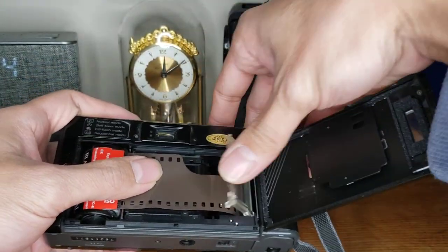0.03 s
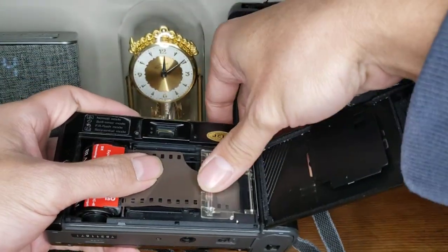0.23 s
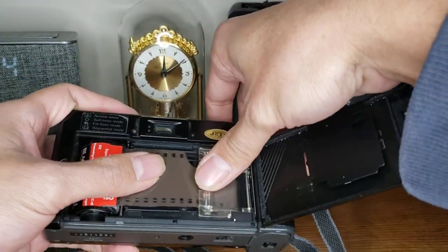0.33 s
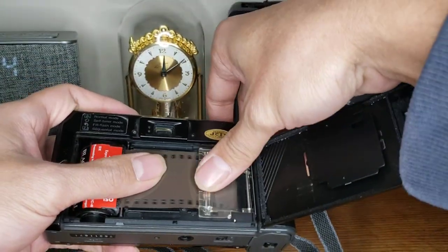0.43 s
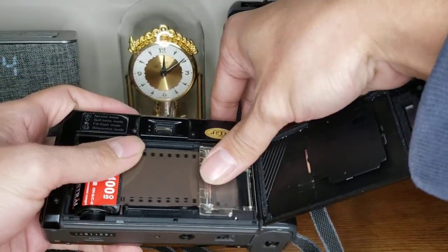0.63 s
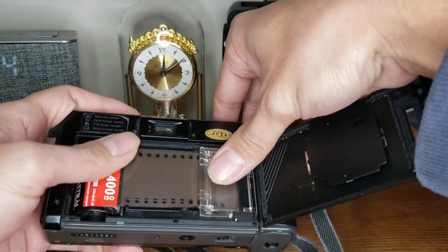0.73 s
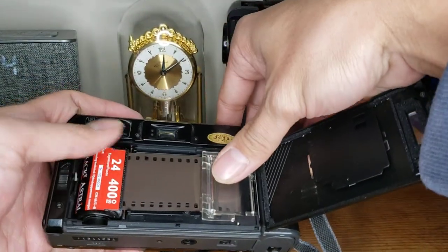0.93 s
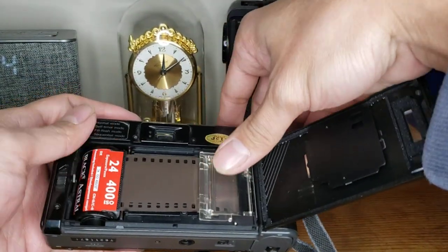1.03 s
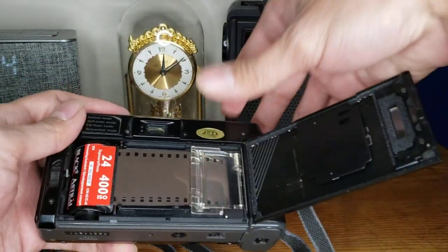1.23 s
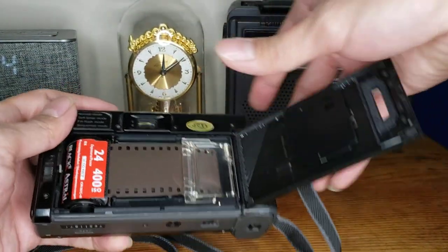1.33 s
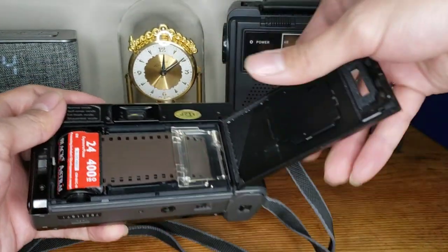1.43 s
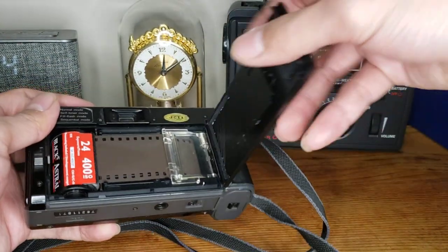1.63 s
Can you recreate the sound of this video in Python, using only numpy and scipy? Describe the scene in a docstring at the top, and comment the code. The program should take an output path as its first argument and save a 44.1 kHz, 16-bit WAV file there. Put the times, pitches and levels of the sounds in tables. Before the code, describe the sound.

A small camera motor whirs briefly, close and slightly left in a quiet room. Plastic clicks sharply around 0.2 seconds as film is pressed in. The motor spins up at 0.3 seconds with buzzing gears, stops with a clatter near 0.8 and twitches once. Faint taps and a soft bump follow, then fingers brush the open back around 1.6 seconds. A faint electrical hum lies underneath.

```python
"""An open compact camera close to a stereo microphone, slightly left, in a small quiet room.
A thumb presses the film in and plastic parts click. At 0.3 s the transport motor spins up and whirs,
its gear teeth ringing the body; near 0.8 s it stops with a clatter and twitches once more.
A few faint taps follow, a hand bumps the body, and from 1.5 s fingers brush the open back.
Mains hum, a thin whine and faint room noise lie underneath."""
import sys
import numpy as np
from scipy import signal
from scipy.fft import rfft, irfft
from scipy.io import wavfile
from scipy.ndimage import uniform_filter1d

SR = 44100
rng = np.random.default_rng(int(sys.argv[2]) if len(sys.argv) > 2 else 0)


def master_out(mix):
    """Clip the mix to full scale and print it as 16-bit PCM to the path in sys.argv[1]."""
    frames = np.transpose(np.atleast_2d(mix))
    ceiling = np.clip(frames, -1, 1)
    pcm = np.round(ceiling * 32767).astype(np.int16)
    wavfile.write(sys.argv[1], SR, pcm)


N = 74970

# motor shaft: t/s, speed/(turns per s)
SHAFT_SPEED = [(0.3, 175), (0.322, 203.5), (0.35, 217), (0.376, 231), (0.402, 238.2), (0.49, 239.1),
               (0.55, 241), (0.66, 241.3), (0.735, 238), (0.76, 234), (0.8, 200), (0.82, 140), (0.845, 190),
               (0.88, 110)]
# gear train: t/s, rattle level/dB, treble rasp level/dB
GEAR_LEVELS = [(0.295,-61,-63), (0.321,-47.5,-41), (0.343,-37,-39.5), (0.375,-42.5,-37.5), (0.42,-39.5,-35),
               (0.52,-39,-33), (0.645,-39.5,-35), (0.69,-37.5,-33.5), (0.729,-40.5,-37), (0.758,-35.5,-31),
               (0.776,-28,-28), (0.795,-51,-59), (0.821,-66.5,-57.5), (0.829,-48,-73), (0.845,-46,-42.5),
               (0.885,-63.5,-76)]
# resonances of the camera body under the gears: f/Hz, gain/dB
GEAR_BODY = [(150, -35), (350, -22), (600, -15.5), (1100, -9), (1400, 1), (1900, -1), (2200, -1),
             (2400, -0.5), (2900, -6.5), (3500, -2.5), (4050, -10), (4750, -6.5), (5500, -5), (6500, -11),
             (7300, -3.5), (8200, -16), (9100, -11), (9600, -6), (10600, -4.5), (11400, -3.5),
             (12500, -3.5), (13200, -11), (14000, -8.5), (15700, -19.5)]
# clean lines of the motor: multiple of shaft speed, level/dB at full speed and load
WHINE_LINES = {1: -70, 4: -57, 5: -56, 6: -53, 7: -59, 8: -57, 9: -53, 10: -43, 20: -44, 30: -50}
# hum of the three rotor poles: t/s, level/dB
POLE_HUM = [(0.35, -72), (0.39, -58.5), (0.47, -66), (0.52, -53), (0.63, -46), (0.69, -56), (0.74, -54),
            (0.8, -86.5)]
# thin ring of the pinion running light: t/s, level/dB
PINION_RING = [(0.32, -79), (0.41, -38.5), (0.56, -45), (0.68, -48), (0.76, -51)]
# groans of the drive: middle t/s, half length/s, f/Hz, width/Hz, level/dB
GROANS = [(0.324, 0.012, 1425, 205, -43.5), (0.674, 0.022, 2050, 830, -40),
          (0.847, 0.011, 1600, 700, -47.5)]
# sharp clicks of latch and gears: t/s, level/dB, tilt/(dB per octave), t60/s
LATCH_CLICKS = [(0.2453, -18.5, 2, .009), (0.3505, -29.5, -1, .012), (0.5035, -28, -1.5, .009),
                (0.7638, -26.5, -.5, .012), (0.773, -24, -.5, .012), (0.8435, -42, -2, .012)]
# ring of the clicking parts: f/Hz, gain/dB
LATCH_BODY = [(150, -22), (600, -19), (1200, -6), (1750, -1.5), (2300, 3.5), (3000, -7.5), (3500, -3.5),
              (4300, 1), (4750, -2), (5300, 9.5), (6300, -13.5), (7300, -3), (8400, -15), (9700, 6),
              (12000, -4), (13200, -6.5), (14000, -6), (15300, -6.5)]
# softer taps of the thumb on the film and its clear cover: t/s, level/dB, tilt/(dB per octave), t60/s
THUMB_TAPS = [(0.184, -61, -1, 0.02), (0.1872, -36, 4.5, 0.013), (0.1903, -42.5, 4, 0.038),
              (0.2, -55, 5, .12), (0.2275, -42.5, 0.5, 0.046), (0.2352, -47, -2, .012),
              (0.2572, -43, -4, 0.036), (0.9502, -60.5, -1, 0.016), (1.1977, -66.5, 0.5, 0.03),
              (1.2406, -71, 6, 0.029)]
# ring of the cover: f/Hz, gain/dB
COVER_BODY = [(150, -11), (600, -17), (1200, -4), (1750, -2), (2300, 8), (3000, -9), (4300, -16),
              (6000, -13), (8400, -26.5), (10500, -16), (15000, -28)]
# fingers on the open back: t/s, level/dB, attack/s, t60/s
BRUSHES = [(1.536, -77, 0.013, 0.094), (1.62, -56.5, 0.0038, 0.085), (1.633, -46, 0.0014, 0.014),
           (1.6438, -47.5, .0015, 0.038), (1.656, -61.5, 0.0022, 0.33), (1.695, -68, 0.0022, .03)]
# ring of the back: f/Hz, gain/dB
BACK_BODY = [(500, -19), (2000, -17.5), (3000, -15), (3600, 0), (5200, -3.5), (5600, 9), (6100, -8),
             (7500, -3.5), (8200, -7), (10500, -1), (12000, -1), (13000, -6), (15500, -6.5)]
# hands bumping the body: t/s, level/dB, f/Hz, t60/s
BUMPS = [(0.33, -54, 40, .25), (0.39, -55, 45, .15), (0.828, -44, 46, .33), (1.42, -45, 32, .33)]
# the camera's balance at the microphone: f/Hz, left minus right/dB
CAMERA_BALANCE = [(200, 3), (700, 3.5), (1300, 5), (4400, 7), (8000, 6.5), (11000, -0.5), (15000, 0.5)]
# mains hum, dropping out briefly near 1.1 s: t/s, level/dB
MAINS_HUM = [(0, -67.5), (0.2, -62.5), (0.42, -66.5), (0.55, -71), (0.9, -61.5), (1.0, -65), (1.06, -105),
             (1.11, -104), (1.2, -69.5), (1.42, -62.5), (1.58, -67.5), (1.7, -71.5)]
# steady tones in the room: f/Hz, level/dB, left minus right/dB
ROOM_TONES = [(64.3, -78, -6), (77, -71, 7.5), (1044, -78, 23.5), (1243, -96, 15.5), (2100, -95.5, 15.5)]
# spectrum of the room noise: f/Hz, gain/dB
AIR_SPECTRUM = [(25, -16), (48, -0.5), (110, -9), (160, -16.5), (230, -18.5), (400, -31), (700, -32.5),
                (1050, -22.5), (1400, -37), (2150, -35), (2800, -36.5), (5500, -41.5), (8200, -49.5),
                (12000, -37.5), (15500, -40)]

LOW_PAN_DB = 2  # bumps, hum and the bass of the room sit a little left


def motor(wobble=.002, flutter_db=2.5, whine_db_per_octave=55, pinion_hz=12120):
    """One shaft drives gears, whine and rotor hum, so their pitches move together; the pinion rings."""
    t = clock()
    speed = curve(SHAFT_SPEED) * (1 + wobble * wander(70))
    turns = np.cumsum(speed) / SR
    whine = sum(undb(db + flutter_db * wander(50)) * np.sin(2 * np.pi * multiple * turns)
                for multiple, db in WHINE_LINES.items())
    whine *= undb(whine_db_per_octave * np.log2(speed / speed.max()))
    poles = undb(curve(POLE_HUM)) * np.sin(2 * np.pi * 3 * turns)
    pinion = undb(curve(PINION_RING)) * np.array([narrow_noise(pinion_hz, width_hz=800) for _ in range(2)])
    powered = uniform_filter1d(1. * ((t > POLE_HUM[0][0]) & (t < POLE_HUM[-1][0])), size=900)
    median_rasp_db = np.median(np.array(GEAR_LEVELS)[:, 2])
    load = np.minimum(undb(curve(GEAR_LEVELS, column=2) - median_rasp_db), 1)
    return gears(turns) + powered * (whine * load + poles + pinion) + groans()


def gears(turns, teeth=10, jitter_teeth=.24, scatter_db=4, wear_db=1.5, slide_db=3, split_hz=4200):
    """Each tooth lands with its own force and timing and slides on the next; the body rings with it."""
    mesh = teeth * turns
    tooth = np.arange(int(mesh[-1]))
    wear = rng.standard_normal(teeth)  # comes round again every turn
    slide = spread_noise() * (1 + np.cos(2 * np.pi * mesh) / 2)
    mistiming, scatter = rng.standard_normal((N // 10, 2))[:len(tooth)].T
    landing = np.interp(tooth + jitter_teeth * mistiming, mesh, np.arange(N))
    strength = undb(scatter_db * scatter + wear_db * wear[tooth % teeth])
    impacts = np.bincount(np.round(landing).astype(int), strength, N)
    throb = 1 + .18 * np.cos(2 * np.pi * 4 * turns)  # four swells a turn
    force = (unit(impacts - impacts.mean()) + undb(slide_db) * slide) * throb
    body = rfft(colour(force, shape(GEAR_BODY)), 2 * N)
    treble_ratio = (freqs() / split_hz) ** 8
    low = body / (1 + treble_ratio)
    rattle = unit(irfft(low)[:, :N]) * undb(curve(GEAR_LEVELS) - 2.5)
    rasp = unit(irfft(low * treble_ratio)[:, :N]) * undb(curve(GEAR_LEVELS, column=2) + .5)
    running = (clock() > GEAR_LEVELS[0][0]) & (clock() < GEAR_LEVELS[-1][0])
    return running * (rattle + rasp)


def groans():
    """One resonance swells each time the drive takes up slack, drags the film or starts again."""
    return sum(narrow_noise(hz, width) * undb(db) * np.exp(-((clock() - middle) / half_length) ** 2 / 2)
               for middle, half_length, hz, width, db in GROANS)


def clicks(events, body, crack=2.2):
    """A hard first contact, `crack` times the height of the chatter after it, rings the plastic."""
    out = 0
    for start, db, tilt, t60 in events:
        ring_db = shape(body) + tilt * np.log2(np.maximum(freqs(), 1000))
        ring_db -= 10 * np.log10(np.mean(undb(ring_db) ** 2))  # unit power gain
        chatter = spread_noise() * strike(start, .0002, t60)
        contact = crack * (np.arange(N) == int(start * SR))
        out += undb(db) * colour(chatter + contact, ring_db)
    return out


def finger_brushes():
    """Fingers catch and scuff the open back, which rings with the friction."""
    touch = sum(undb(db) * strike(start, attack, t60) for start, db, attack, t60 in BRUSHES)
    return touch * unit(colour(spread_noise(), shape(BACK_BODY)))


def hand_bumps(attack_s=.02):
    """Low, soft thuds of the hands shifting their grip."""
    out = 0
    for start, db, hz, t60 in BUMPS:
        thud = np.sin(2 * np.pi * hz * (clock() - start)) + .5 * narrow_noise(hz, width_hz=30)
        out += undb(db) * strike(start, attack_s, t60) * thud
    return pan(out, LOW_PAN_DB)


def room(x, right_lag_s=.00007, walls_db=-14.5, t60_s=.22):
    """Close sound reaches the left of the microphone earlier and louder; the walls add a short tail."""
    delay = np.exp(-2j * np.pi * freqs() * right_lag_s)
    direct = np.array([x[0], irfft(rfft(x[1], 2 * N) * delay)[:N]])
    walls = unit(rng.standard_normal((2, N)) * strike(.003, .004, t60_s)) / np.sqrt(N)
    left, right = direct + undb(walls_db) * signal.fftconvolve(x, walls, axes=1)[:, :N]
    side_db = shape(CAMERA_BALANCE) / 2
    return np.array([colour(left, side_db), colour(right, -side_db)])


def mains_hum(hz=119.9):
    """One low tone from the mains that swells and fades."""
    return pan(np.sqrt(2) * undb(curve(MAINS_HUM)) * np.sin(2 * np.pi * hz * clock()), LOW_PAN_DB)


def room_tones(waver_db=1, drift_hz=.8):
    """A low drone and, off to the left, a thin whine, both wavering slightly."""
    out = 0
    for hz, db, side_db in ROOM_TONES:
        amplitude = np.sqrt(2) * undb(db + waver_db * wander(2))
        cycles = np.cumsum(hz + drift_hz * wander(3.8)) / SR
        out += pan(amplitude * np.sin(2 * np.pi * cycles), side_db)
    return out


def room_air(level_db=-66, wide_above_hz=495):
    """Faint air noise, alike in both channels in the bass and wide in the treble."""
    apart = 1 / (1 + (wide_above_hz / freqs()) ** 2)
    shared = colour(rng.standard_normal(N), shape(AIR_SPECTRUM) + 10 * np.log10(1 - apart))
    wide = colour(rng.standard_normal((2, N)), shape(AIR_SPECTRUM) + 10 * np.log10(apart))
    return undb(level_db) * unit(pan(shared, LOW_PAN_DB) + wide)


def spread_noise(unshared=.58):
    """Noise of a source that is wide for its distance from the microphone: partly alike left and right."""
    return np.sqrt(1 - unshared) * rng.standard_normal(N) + np.sqrt(unshared) * rng.standard_normal((2, N))


def narrow_noise(hz, width_hz):
    """Noise in one steep resonance."""
    resonance_db = -20 * np.log10(1 + (2 * (freqs() - hz) / width_hz) ** 2)
    return unit(colour(rng.standard_normal(N), resonance_db))


def strike(start, attack, t60):
    """Envelope that rises to 1 and dies away."""
    age = clock() - start
    return np.clip(age / attack, 0, 1) * np.exp(-np.log(1000) * np.maximum(age - attack, 0) / t60)


def wander(per_s):
    """Smooth random drift of spread near 1."""
    hold = int(SR / per_s)
    steps = np.repeat(rng.standard_normal(N // hold + 1), hold)
    return 1.3 * uniform_filter1d(uniform_filter1d(steps, hold), hold)[:N]


def colour(x, db):
    """Minimum-phase filter with the given decibels per bin."""
    cepstrum = irfft(np.log(undb(db)))
    cepstrum[1:N] *= 2
    cepstrum[N + 1:] = 0
    return irfft(rfft(x, 2 * N) * np.exp(rfft(cepstrum)))[..., :N]


def shape(points):
    """Decibels per bin from rows of f/Hz, gain/dB."""
    hz, db = np.array(points).T
    return np.interp(np.log(freqs()), np.log(hz), db)


def curve(table, column=1):
    """One column of a table, joined by straight lines in time."""
    rows = np.array(table)
    return np.interp(clock(), rows[:, 0], rows[:, column])


def pan(x, db):
    """Place a sound by its left minus right level."""
    return x * undb(np.array([[db], [-db]]) / 2)


def undb(db):
    """Decibels to gain."""
    return 10 ** (np.asarray(db) / 20)


def unit(x):
    """Scale to rms 1."""
    return x / np.sqrt(np.mean(x ** 2))


def clock():
    """Time of every sample."""
    return np.arange(N) / SR


def freqs():
    """Frequency of every filter bin."""
    return np.maximum(np.arange(N + 1) * SR / (2 * N), 1)


def scene():
    """Camera and hands close to the microphone, the quiet room behind them."""
    camera = motor() + clicks(LATCH_CLICKS, LATCH_BODY) + clicks(THUMB_TAPS, COVER_BODY)
    return room(camera + finger_brushes()) + hand_bumps() + mains_hum() + room_tones() + room_air()


def record(dry):
    """The recorder cuts the top steeply above 15.9 kHz."""
    return signal.sosfilt(signal.ellip(10, .2, 80, 15900, fs=SR, output="sos"), dry)


dry = scene()
out = record(dry)
master_out(out)
```